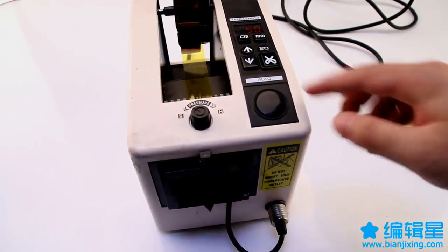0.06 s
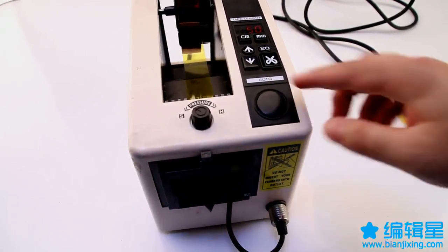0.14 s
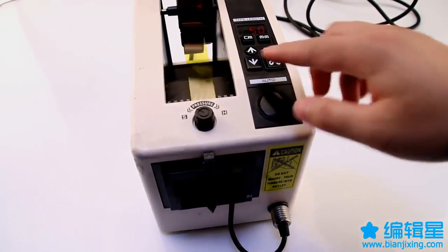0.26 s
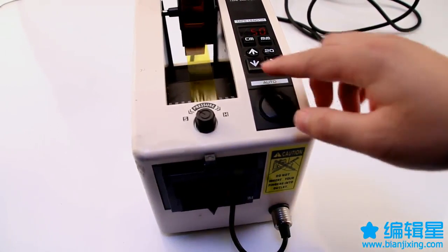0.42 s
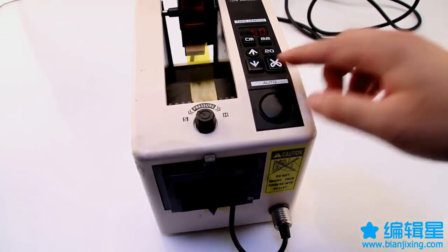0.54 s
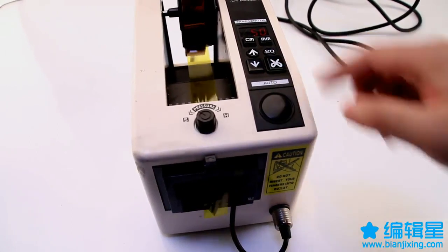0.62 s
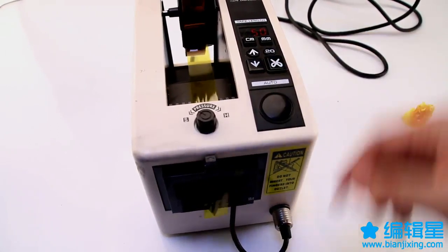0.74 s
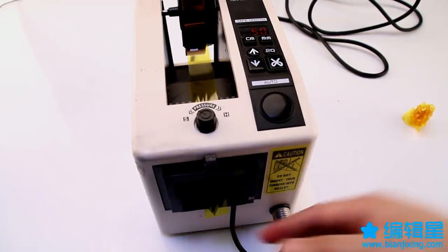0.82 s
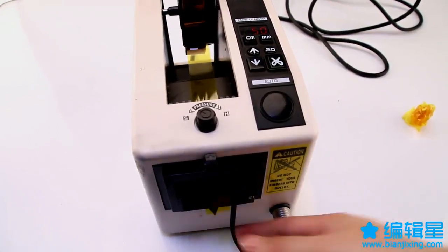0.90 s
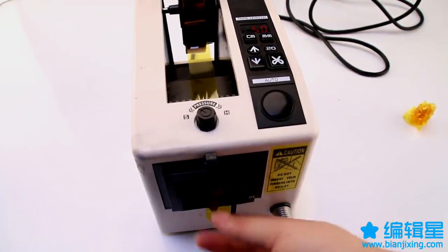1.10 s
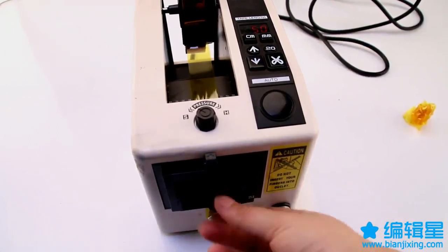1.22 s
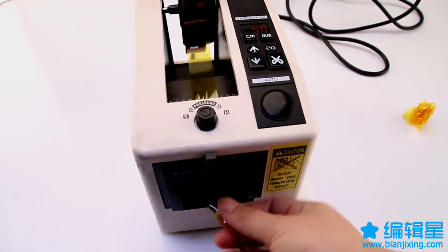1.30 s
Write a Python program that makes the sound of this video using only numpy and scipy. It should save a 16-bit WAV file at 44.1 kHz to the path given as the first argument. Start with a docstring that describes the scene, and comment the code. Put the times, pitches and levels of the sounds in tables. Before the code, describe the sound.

Close by in a small room, a desktop tape dispenser spins up and feeds tape with a geared whine. A second motor winds up, and the blade slices with a crunch and snaps back sharply.

```python
"""Desktop tape dispenser, one cycle

A stereo microphone close to the machine, on a table in a small room. A button goes down and the geared
feed motor spins up with a rising whine and rattle, sweeping the resonances of the plastic case.
Then the cutter motor winds up, drives the blade through the tape with a crunch and snaps it back;
a hand touches the tape."""
import sys
import numpy as np
from scipy import signal
from scipy.fft import rfft, irfft, next_fast_len
from scipy.io import wavfile

SR = 44100
rng = np.random.default_rng(int(sys.argv[2]) if len(sys.argv) > 2 else 0)


def inscribe(sig):
    """Save sig as 16-bit PCM at rate SR to the path in sys.argv[1].

    A 1-D sig is mono; a 2-D sig holds one channel per row.
    Samples are clipped to [-1, 1] before scaling.
    """
    pcm = np.round(np.clip(np.atleast_2d(sig).T, -1, 1) * 32767)
    wavfile.write(sys.argv[1], SR, pcm.astype(np.int16))


N = 59535
T = np.arange(N) / SR


def from_db(db):
    """Decibels to gain."""
    return 10 ** (np.asarray(db) / 20)


def unit_power(x):
    """Scale to an RMS of 1."""
    return x / np.sqrt(np.mean(x ** 2) + 1e-20)


def pan(db):
    """Left and right gains, the left louder by db."""
    return from_db(np.array([[db], [-db]]) / 2)


def drift(rate_hz):
    """A smooth random wander with an RMS of 1."""
    pole = np.exp(-2 * np.pi * rate_hz / SR)
    return unit_power(signal.lfilter([1], [1, -2 * pole, pole * pole], rng.standard_normal(2 * N))[N:])


def blow(start, decay_s, attack_s=.0027):
    """The envelope of a contact: quick rise, exponential fall."""
    age = np.maximum(T - start, 0)
    return np.minimum(age / attack_s, 1) * np.exp(-np.maximum(age - attack_s, 0) / decay_s)


def colour(x, spectrum):
    """Shape a steady sound by a spectrum of (Hz, dB) points."""
    hz, db = np.transpose(spectrum)
    size = next_fast_len(N)
    bin_hz = np.maximum(np.arange(size // 2 + 1) * SR / size, 1)
    gain = from_db(np.interp(np.log(bin_hz), np.log(hz), db))
    return irfft(rfft(x, size) * gain, size)[..., :N]


def stereo(pair, spectrum):
    """Two unrelated noises become a coloured middle and side, then left and right."""
    # Stereo width. Each row: frequency in Hz, side relative to middle in dB.
    width = [(30, -1), (120, -11), (260, -19.5), (550, -13.5), (1100, -10.5), (2400, -4.5), (5000, -0.5),
             (9000, -5), (14000, -2)]
    mid, side = colour(pair, spectrum)
    return (mid + colour(side, width) * np.array([[1], [-1]])) / np.std(mid)


def room_tone():
    """The steady, low hush of the room."""
    # Its spectrum. Each row: frequency in Hz, relative level in dB.
    hush = [(25, -16), (70, -17.5), (130, 0), (190, 0.5), (300, -4.5), (520, 6), (850, 3.5), (1200, -5),
            (1800, -3), (3500, -13.5), (7000, -22.5), (15000, -31)]
    return from_db(-44.5) * stereo(rng.standard_normal((2, N)), hush)


def room_reverb(x, t60_s=.28, wide_above_hz=1510, dull_above_hz=6550):
    """The walls return a short diffuse tail, dull on top and wide only above the bass."""
    mid, side = rng.standard_normal((2, N)) * from_db(-60 * T / t60_s)
    side = signal.sosfilt(signal.butter(2, wide_above_hz, "high", fs=SR, output="sos"), side)
    tail = mid + side * np.array([[1], [-1]])
    tail = signal.sosfilt(signal.butter(1, dull_above_hz, fs=SR, output="sos"), tail)
    tail /= np.sqrt(2 * np.sum(mid ** 2))
    return from_db(-9) * signal.fftconvolve(x, tail, axes=1)[:, :N]


def ripple(x, depth_db=3.5, spacing_hz=44.93, full_above_hz=2450):
    """Many close resonances of small parts ripple the treble."""
    size = next_fast_len(N + 4096)
    hz = np.arange(size // 2 + 1) * SR / size
    peaks = np.clip(rng.standard_normal((2, 2048)), -2, 2)
    contour = np.array([np.interp(hz / spacing_hz, np.arange(len(p)), p) for p in peaks])
    treble = np.minimum(hz / full_above_hz, 1) ** 2
    return irfft(rfft(x, size) * from_db(depth_db * treble * contour), size)[:, :N]


def grit(spectrum, grains_per_s=3000, spread_db=1.5):
    """Dense tiny contacts of uneven size over friction hiss."""
    sizes = from_db(spread_db * np.minimum(rng.exponential(1, N), 4))
    clicks = (rng.random(N) < grains_per_s / SR) * sizes * rng.choice([-1, 1], (2, N))
    hiss = .83 * rng.standard_normal((2, N))
    return stereo(ripple(unit_power(clicks) + hiss), spectrum)


def clack_noise():
    """The bright noise of hard parts meeting."""
    # Its spectrum. Each row: frequency in Hz, relative level in dB.
    spectrum = [(200, -41), (600, -3), (1200, -5), (2000, 3), (3000, -3.5), (4000, -1), (5000, -6),
                (8000, -7), (11000, -11), (15000, -18.5)]
    return grit(spectrum)


def hand():
    """A finger presses the button, the switch clicks, and later the hand meets the cut strip."""
    # The button's dull rub. Each row: frequency in Hz, relative level in dB.
    rub = [(60, -10), (200, -8), (900, 4.5), (3500, -7.5), (6000, -24), (14000, -30)]
    # Light clicks of switch and tape. Each row: start in seconds, level in dB.
    ticks = [(0.201, -54), (1.19, -48), (1.231, -38.5), (1.258, -51)]
    press = from_db(-39) * blow(.141, decay_s=.12) * grit(rub)
    return press + sum(from_db(db) * blow(start, decay_s=.0055) for start, db in ticks) * clack_noise()


def case(x):
    """The plastic shell adds its resonances to all that moves inside."""
    # Shell modes. Each row: frequency in Hz, bandwidth in Hz, gain in dB.
    modes = [(321.7, 11, 3.5), (699, 17, -9), (974, 28, 11), (1140.5, 20, 0), (1190, 13, -9),
             (1284, 24, 1.5), (1404, 30, -2), (1657, 20, 1), (1714, 44, -16), (1930, 110, -9.5),
             (2110, 35, -7), (2630, 89, -5), (3266, 117, -2.5), (3940, 114, -3), (4470, 56, -17),
             (5620, 420, -5), (6170, 290, -9.5)]
    out = x
    for hz, width, db in modes:
        radius = np.exp(-np.pi * width / SR)
        feedforward = np.array([1, 0, -1]) * (1 - radius ** 2) / 2
        feedback = [1, -2 * radius * np.cos(2 * np.pi * hz / SR), radius ** 2]
        out = out + from_db(db) * signal.lfilter(feedforward, feedback, x)
    return out


def case_song(attack_s=.0023, release_s=.018, wobble=.01984):
    """Under load the case sings: wavering tones build and ring out."""
    # Sung tones. Each row: start and end in seconds, pitch in Hz, level in dB.
    tones = [(0.249, 0.326, 995, -27), (0.441, 0.532, 981.7, -21), (0.48, 0.555, 1198, -33),
             (0.774, .795, 970, -29.5), (0.989, 1, 969, -35.5), (1.075, 1.114, 233.7, -44.5)]
    wavering_time = np.cumsum(1 + wobble * drift(43.1)) / SR
    out = 0
    for start, end, hz, db in tones:
        rise = 1 - np.exp(-np.maximum(T - start, 0) / attack_s)
        fall = np.exp(-np.maximum(T - end, 0) / release_s)
        out = out + from_db(db) * rise * fall * np.sqrt(2) * np.sin(2 * np.pi * hz * wavering_time)
    return out


def spin_up(start, lag_s):
    """Share of top speed of a motor switched on at start."""
    return 1 - np.exp(-np.maximum(T - start, 0) / lag_s)


def gears(speed, tones, spectrum, drive, top_hz, wobble, flutter_db=2, roughness=.33):
    """Mesh tones roughened by uneven teeth, and a rattle that brightens with speed."""
    times, *levels_db = np.transpose(drive)
    rattle_gain, whine_gain = [from_db(np.interp(T, times, db, left=-120, right=-120))
                               for db in levels_db]
    mesh_phase = 2 * np.pi * np.cumsum(top_hz * speed * (1 + wobble * drift(76))) / SR
    whine = sum(np.sqrt(2) * from_db(db + flutter_db * drift(46)) * np.sin(multiple * mesh_phase)
                for multiple, db in tones)
    bright = grit(spectrum)
    dull = signal.sosfilt(signal.butter(1, 2550, fs=SR, output="sos"), bright)
    rattle = dull + (bright - dull) * speed ** .77
    return whine_gain * whine * (1 + roughness * drift(190)), rattle_gain * rattle


def feed_motor():
    """The rollers pull tape while their motor gathers speed."""
    # Gear tones. Each row: multiple of the mesh pitch, relative level in dB.
    tones = [(1, 1.5), (.73, -4.5), (.635, -12), (.9, -12.5), (.54, -15), (.26, -16), (.18, -24)]
    # Gear rattle. Each row: frequency in Hz, relative level in dB.
    rattle = [(40, -30), (120, -18), (330, -12.5), (700, -12.5), (1100, -0.5), (1700, -2), (2300, -8.5),
              (3900, -9.5), (4900, -18), (9500, -19), (15000, -27.5)]
    # Loudness of the run. Each row: time in seconds, rattle gain in dB, whine gain in dB.
    drive = [(.2, -45, -61), (0.207, -34.5, -43.5), (.245, -29, -28.5), (.315, -25.5, -29),
             (.345, -28, -25.5), (.40, -26, -20), (.46, -24.5, -30.5), (0.538, -24.5, -25),
             (0.55, -24.5, -49), (.563, -39.5, -33), (.62, -43, -70)]
    return gears(spin_up(.152, lag_s=.112), tones, rattle, drive, top_hz=1991, wobble=.0055)


def cutter_motor():
    """A faster motor that sags while the blade is in the tape."""
    # Gear tones. Each row: multiple of the mesh pitch, relative level in dB.
    tones = [(1, 1), (.38, -9), (1.4, -19), (1.8, -13.5), (3, -16.5)]
    # Gear rattle. Each row: frequency in Hz, relative level in dB.
    rattle = [(40, -19), (150, -9.5), (270, 0.5), (600, -2.5), (1100, -0.5), (2100, -7), (3500, -8.5),
              (4700, -17), (6500, -14.5), (8500, -17), (10500, -18), (15000, -28.5)]
    # Loudness of the run. Each row: time in seconds, rattle gain in dB, whine gain in dB.
    drive = [(0.589, -48, -67), (.612, -37, -39.5), (0.629, -34, -31), (0.684, -40.5, -35.5),
             (.71, -38.5, -40), (0.764, -41.5, -46), (0.774, -28, -31.5), (.80, -32, -35.5),
             (.87, -33.5, -43), (.93, -37, -44.5), (.97, -38, -49), (1.02, -34, -48), (1.061, -34.5, -36),
             (1.085, -42, -62), (1.14, -52.5, -54), (1.2, -84, -80)]
    sag = .11 * np.exp(-.5 * ((T - .848) / .034) ** 2)
    speed = spin_up(.565, lag_s=.075) * (1 - sag)
    return gears(speed, tones, rattle, drive, top_hz=2860, wobble=.01218)


def blade():
    """The blade engages, crunches through the tape and clatters back."""
    # Scrapes through the tape. Each row: centre and width in seconds, level in dB.
    scrapes = [(0.822, 0.011, -20.5), (0.867, 0.012, -28.5), (0.912, 0.018, -34.5)]
    # Cutter knocks. Each row: start in seconds, clack and thud levels in dB, decay in seconds.
    knocks = [(0.7657, -25.5, -36, 0.0088), (0.9797, -17, -29.5, 0.0089), (.991, -27, -19, 0.0039),
              (1, -21, -27, 0.0091), (1.009, -42, -20, 0.0038)]
    # Spectra of the shearing and the thud. Each row: frequency in Hz, relative level in dB.
    shear_spectrum = [(40, -37), (115, -1.5), (155, -20), (215, 2), (330, 3), (480, -3.5), (650, 3),
                      (800, -3), (1400, -10), (2300, -3), (4700, -18), (10000, -20), (15000, -32)]
    thud_spectrum = [(30, -16), (120, -9), (155, -38), (200, 6.5), (330, 6), (520, -10), (1000, -7),
                     (2000, -16), (8000, -26)]
    shear = sum(from_db(db) * np.exp(-.5 * ((T - centre) / width) ** 2) for centre, width, db in scrapes)
    clack = sum(from_db(db) * blow(start, decay) for start, db, _, decay in knocks)
    thud = sum(from_db(db) * blow(start, decay) for start, _, db, decay in knocks)
    return shear * grit(shear_spectrum) + clack * clack_noise() + thud * grit(thud_spectrum)


def scene():
    """The machine almost straight ahead of the microphone, with its reverb and the room tone."""
    feed_whine, feed_rattle = feed_motor()
    cutter_whine, cutter_rattle = cutter_motor()
    noises = case(feed_rattle * pan(-.2) + (cutter_rattle + blade()) * pan(-.3)) + hand()
    tones = (case(feed_whine + cutter_whine) * from_db(-3) + case_song()) * pan(1.4)
    machine = noises + tones
    return machine + room_tone() + room_reverb(machine)


def record(dry, ceiling=.5, cutoff_hz=15300):
    """The highest peaks are rounded and the top is cut steeply."""
    rounded = ceiling * np.tanh(dry / ceiling)
    return signal.sosfilt(signal.ellip(10, .2, 80, cutoff_hz, fs=SR, output="sos"), rounded)


dry = scene()
out = record(dry)
inscribe(out)
```